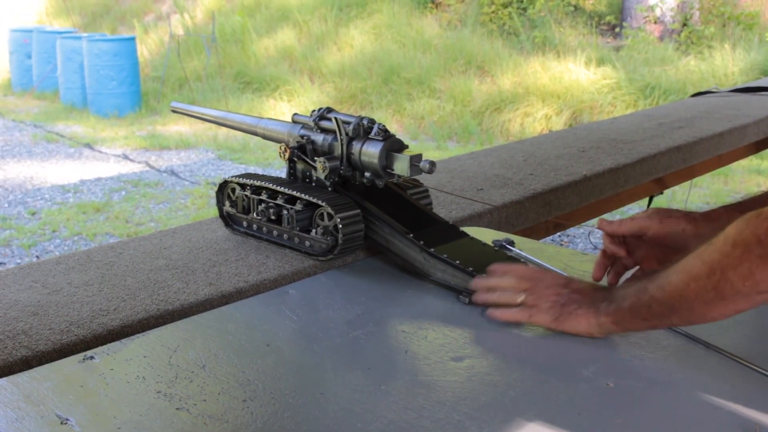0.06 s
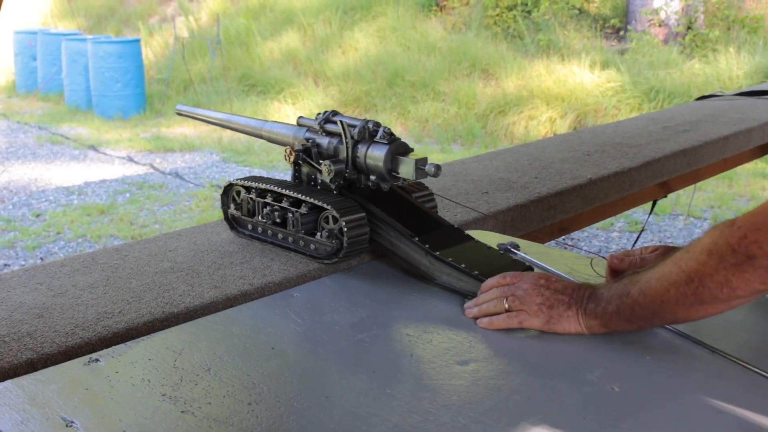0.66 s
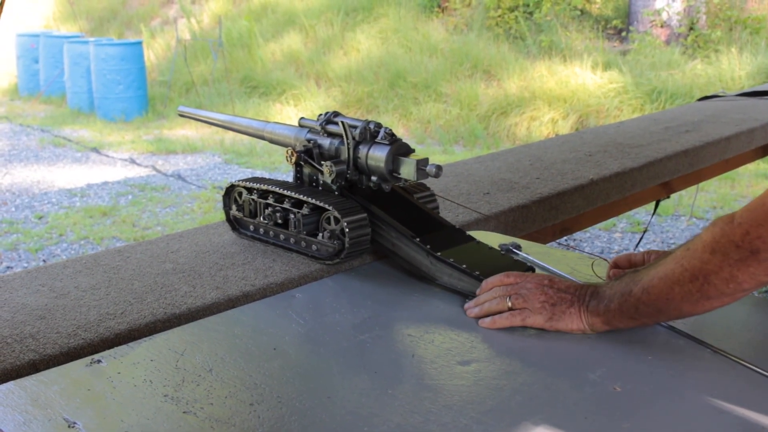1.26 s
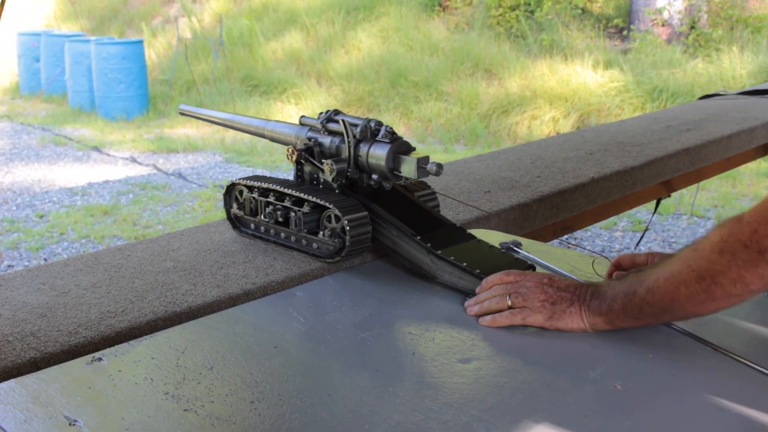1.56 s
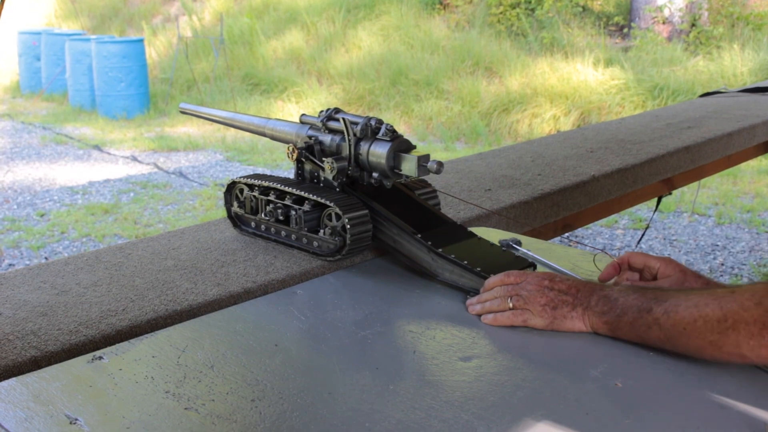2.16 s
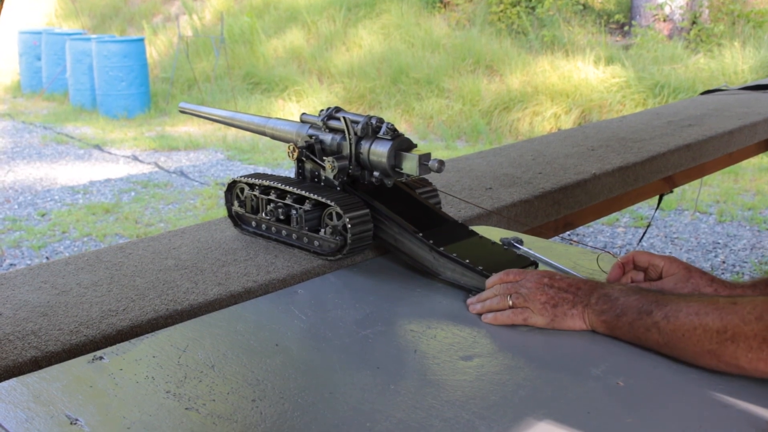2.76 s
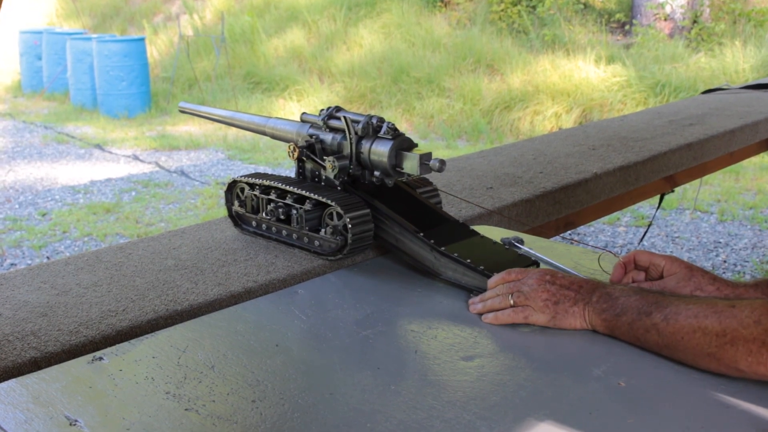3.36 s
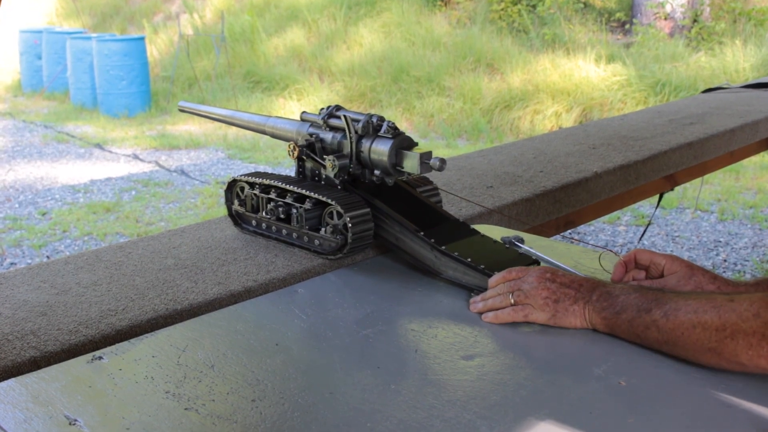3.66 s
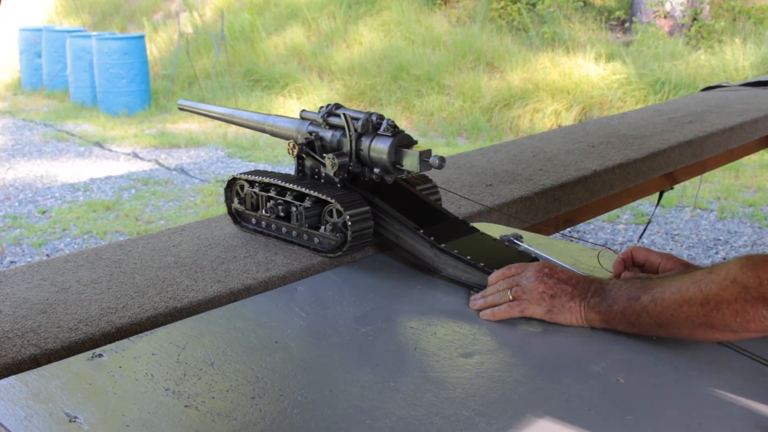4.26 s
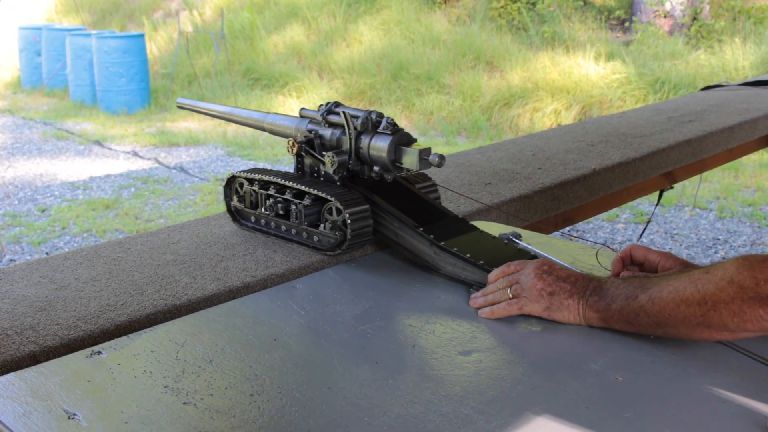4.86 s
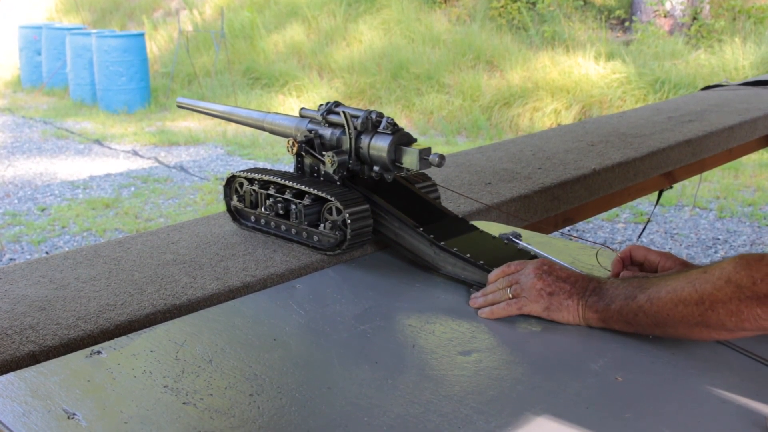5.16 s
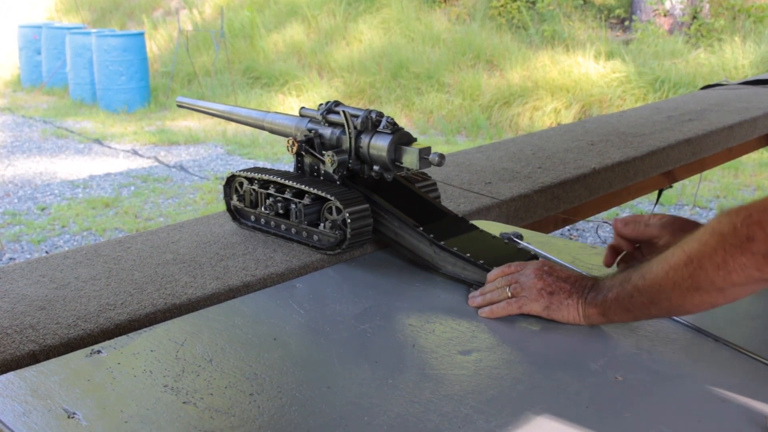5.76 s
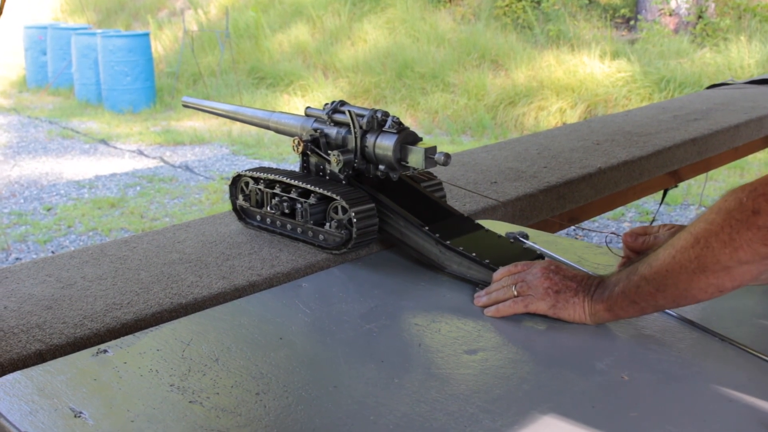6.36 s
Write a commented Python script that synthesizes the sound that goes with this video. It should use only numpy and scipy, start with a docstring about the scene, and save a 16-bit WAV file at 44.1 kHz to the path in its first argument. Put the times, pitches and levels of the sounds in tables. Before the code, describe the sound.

One echoing gunshot, followed by a gritty scrape, knocks and light ticks of handled metal, a distant thud and close birdsong.

```python
"""A model cannon at a shooting range

Under the range's roof a shot rings briefly, then rolls away as echoes from the woods. A metal model cannon
and its rod are handled on a bench: stick-slip friction scuffs and crackles, impacts knock, tick and thump.
Birds whistle gliding tones, one close by and others in the reverberant trees. A distant thud booms low,
perhaps a far shot. The air stirs, insects drone thinly and a camera's electronics whine faintly."""
import sys
import numpy as np
from scipy import signal
from scipy.io import wavfile
from scipy.ndimage import uniform_filter1d

SR = 44100
rng = np.random.default_rng(int(sys.argv[2]) if len(sys.argv) > 2 else 0)


def log_audio(samples):
    """Write samples as a 16-bit WAV file to the path given in sys.argv[1]."""
    # one column per channel
    frames = np.atleast_2d(samples).T
    # limit to full scale, then quantise
    limited = np.clip(frames, -1, 1)
    pcm = np.round(limited * 32767).astype(np.int16)
    wavfile.write(sys.argv[1], SR, pcm)


N = 282681
TIME = np.arange(N) / SR


def from_db(db):
    """Amplitude ratio of a level in decibels."""
    return 10 ** (np.asarray(db) / 20)


def unit_rms(x):
    """Normalisation to unit mean power."""
    return x / np.sqrt(np.mean(x ** 2) + 1e-20)


def band(x, low_hz, high_hz, order=2):
    """Causal Butterworth band-pass."""
    edges = np.clip([low_hz, max(high_hz, low_hz + 10)], 10, SR / 2 - 20)
    return signal.sosfilt(signal.butter(order, edges, "band", fs=SR, output="sos"), x + 1e-18)


def drift(rate_hz):
    """Slow random modulation: low-passed noise of unit rms."""
    step, settle = 40, 2000
    pole = np.exp(-2 * np.pi * rate_hz * step / SR)
    noise = rng.standard_normal(N // step + settle + 2)
    slow = signal.lfilter([1], [1, -2 * pole, pole * pole], noise)[settle:]
    return np.interp(np.arange(N) / step, np.arange(len(slow)), unit_rms(slow))


def add(out, start_s, sound):
    """Superposition of a short sound on a longer one."""
    at = max(round(start_s * SR), 0)
    out[at:at + len(sound)] += sound[:N - at]


def coloured(sources, spectrum, tilt_db=0, pivot_hz=1000, flicker_db=0):
    """Spectral shaping: two sources feed alternate third-octave bands; the tilt is per octave."""
    edges = 22 * 2 ** (np.arange(30) / 3)
    points_hz, points_db = np.transpose(spectrum)
    out, power = 0, 0
    for k, (low, high) in enumerate(zip(edges, edges[1:])):
        hz = np.sqrt(low * high)
        gain = from_db(np.interp(np.log(hz), np.log(points_hz), points_db))
        power += gain ** 2 * (high - low) / (SR / 2)
        octaves = np.log2(max(hz, pivot_hz / 2) / pivot_hz)
        modulation = from_db(tilt_db * octaves + flicker_db * drift(9))
        out += gain * modulation * band(sources[k % 2], low, high, order=3)
    return out / np.sqrt(power)


def swell(full_s, hold_s, level_db, attack_s, release_s):
    """Envelope of exponential growth, a plateau and exponential decay."""
    early, late = np.maximum(full_s - TIME, 0), np.maximum(TIME - full_s - hold_s, 0)
    return from_db(level_db) * np.exp(-np.minimum(early / attack_s + late / release_s, 30))


def joint_swell(rows):
    """Incoherent addition: overlapping swells sum in power."""
    return np.sqrt(sum(swell(*row) ** 2 for row in rows))


# Spectrum of the open air: frequency_hz, density_db
AIR_SPECTRUM = [(15, -42.5), (25, -11), (82, 5), (113, -1), (198, -3), (260, -5.5), (421, -6.5),
                (537, -10.5), (1660, -14.5), (2120, -17), (2290, -11.5), (4740, -10.5), (5880, -13),
                (7910, -26.5), (15500, -37.5)]

def air():
    """Ambient noise: stirring air makes each band fluctuate slightly."""
    return from_db(-48) * coloured(rng.standard_normal((2, N)), AIR_SPECTRUM, flicker_db=1.69)


# Band of the insect chorus: centre_hz, width_hz, level_db
INSECT_BANDS = [(5864, 588, -50.5)]

def insects():
    """Many incoherent callers merge into narrow-band noise."""
    chorus = 0
    for hz, width, level_db in INSECT_BANDS:
        drone = band(rng.standard_normal(N), hz - width / 2, hz + width / 2, order=3)
        chorus += from_db(level_db) * unit_rms(drone)
    return chorus * from_db(.7 * drift(45))


def whine(pitch_hz=15735, rms_db=-75):
    """A pure tone: the camera's electronics sing at their line-scan rate."""
    return from_db(rms_db) * np.sqrt(2) * np.sin(2 * np.pi * pitch_hz * TIME)


# Modes rung by the blast under the roof: frequency_hz, level_db, t60_s
ROOF_MODES = [(148.25, -5.5, 0.049), (388.3, 7.5, 0.0305), (690, -5, 0.074), (1126.6, -12, 0.131)]
# Spectrum of the rolling echoes: frequency_hz, density_db
ECHO_SPECTRUM = [(59, -59), (100, -27.5), (157, -16.5), (221, -15), (282, -13.5), (346, -1), (443, 0),
                 (495, -1), (1010, -10), (1160, -9), (1780, -17), (4240, -38), (5840, -53), (9000, -75.5),
                 (11700, -88), (19800, -120)]
# Returns from roof, woods, a slope and distant hills: arrival_s, hold_s, level_db, attack_s, release_s
SHOT_ECHOES = [(0, 0, -10.5, .002, 0.0458), (.01, 0, -18.5, 0.0112, 0.52), (.285, 0, -22, 0.065, 0.23),
               (1.5, 0, -46.5, .5, 0.884)]

def shot(start_s=.00122, rise_s=.001295):
    """A blast wave excites damped modes; later echoes have travelled farther and are duller."""
    t = np.maximum(TIME - start_s, 0)
    ring = -sum(from_db(db - 60 * t / t60) * np.sin(2 * np.pi * hz * t) for hz, db, t60 in ROOF_MODES)
    blast = band(ring * (1 - np.exp(-t / rise_s)), low_hz=70, high_hz=2700)
    dulling_db = -2 * np.clip(TIME - .3, -.05, 2)
    roll = coloured(rng.standard_normal((2, N)), ECHO_SPECTRUM, dulling_db, pivot_hz=606, flicker_db=.5)
    return blast + roll * joint_swell(SHOT_ECHOES)


def slur(start_s, length_s, from_hz, to_hz, bend, level_db, crest, edge_db=-13, roundness=1.462):
    """Glide contour, rows of time_s, pitch_hz, level_db; positive bend moves early, negative late."""
    progress = np.linspace(0, 1, 60)
    glide = np.expm1(-bend * progress) / np.expm1(-bend)
    pitch_hz = from_hz + (to_hz - from_hz) * glide
    off_crest = np.maximum((crest - progress) / crest, (progress - crest) / (1 - crest))
    return np.transpose([start_s + length_s * progress, pitch_hz, level_db + edge_db * off_crest ** roundness])


def whistle(contour, waver=.003, harmonics=((1, 0),), fade_s=.0013):
    """Frequency modulation: a bird's tone follows its contour, slightly unsteady in pitch."""
    times, pitch_hz, level_db = np.transpose(contour)
    t = np.arange(times[0], times[-1], 1 / SR)
    jitter = unit_rms(uniform_filter1d(rng.standard_normal(len(t)), size=120))
    glide_hz = uniform_filter1d(np.interp(t, times, pitch_hz), size=200)
    phase = 2 * np.pi * np.cumsum(glide_hz * (1 + waver * jitter)) / SR
    tone = sum(from_db(db) * np.sin(k * phase) for k, db in harmonics)
    fade = np.clip(np.minimum(t - times[0], times[-1] - t) / fade_s, 0, 1)
    out = np.zeros(N)
    add(out, times[0], from_db(np.interp(t, times, level_db)) * fade * tone)
    return out


def woods(x, t60_s, build_s):
    """Reverberation: scattering from trunks and leaves builds up and dies away."""
    t = TIME[:SR]
    echoes = rng.standard_normal(SR) * from_db(-60 * t / t60_s) * (1 - np.exp(-t / build_s))
    return signal.fftconvolve(x, echoes / np.linalg.norm(echoes))[:N]


# A phrase of two falling slurs: offset_s, length_s, from_hz, to_hz, bend, level_db, crest_fraction
FAR_PHRASE = [(0, .09, 3503, 2420, .5, 0, .58), (0.214, .1, 2220, 1778, 2.03, -10.5, 0.345)]
# Its repeats, about 0.8 s apart: start_s, gain_db
PHRASE_REPEATS = [(1.035, -57), (1.8, -53.5), (2.61, -52.5), (3.46, -41)]
# Single calls from the trees: start_s, length_s, from_hz, to_hz, bend, level_db, crest_fraction
FAR_SLURS = [(3.35, 0.0553, 1857, 1719, -1, -54, 0.45), (3.55, .11, 2672, 2362, -1.5, -50, 0.454),
             (3.785, .125, 1850, 2501, 0.02, -55, .55), (4.314, 0.1105, 3400, 3836, 3.5, -40, 0.43),
             (4.601, 0.1117, 3329, 3788, 3, -40.5, 0.466), (5.869, .08, 2004, 2811, 5, -47, 0.46),
             (6.051, 0.132, 785, 737.3, 0.35, -61, 0.58), (6.133, 0.27, 2299, 1746, 2, -51, 0.096)]

def far_birds():
    """Far from a source, the reverberant field outweighs the direct sound."""
    notes = [slur(*note) + [start_s, 0, db] for start_s, db in PHRASE_REPEATS for note in FAR_PHRASE]
    notes += [slur(*row) for row in FAR_SLURS]
    calls = sum(whistle(note, waver=.0075) for note in notes)
    early = from_db(7) * woods(calls, t60_s=.1408, build_s=.0035)
    late = from_db(2) * woods(calls, t60_s=1, build_s=.0027)
    return from_db(4) * calls + early + late


def slips(per_s, spread_db):
    """Stick-slip friction: tiny clicks of uneven size at random moments."""
    clicks = (rng.random(N) < per_s / SR) * rng.choice([-1, 1], N)
    sizes = from_db(spread_db * np.minimum(rng.exponential(1, N), 4))
    return unit_rms(clicks * sizes)


# Spectrum of sliding over grit: frequency_hz, density_db
GRIT_SPECTRUM = [(59, -49.5), (100, -26.5), (258, -13), (438, -17), (564, -6.5), (640, -9), (842, -3.5),
                 (1260, -5), (2220, -0.5), (2470, -7), (3050, -2.5), (6120, -7), (15500, -33)]
# Gritty strokes: full_s, hold_s, level_db, attack_s, release_s, tilt_db_per_octave
SCUFF_STROKES = [(1.391, 0.0044, -39.5, 0.0097, 0.0256, 0), (1.476, 0.0395, -28.5, 0.0188, 0.021, -0.12),
                 (1.528, 0.0352, -15.5, 0.0121, 0.0245, -3), (1.59, .04, -34, .02, 0.0313, -4),
                 (1.732, 0.00041, -37, 0.0044, 0.037, -8), (1.744, 0.039, -42, .01, 0.0204, 3),
                 (1.845, 0.0077, -37.5, 0.0112, 0.0337, -.5)]

def scuffs(lag_s=.0024, reflection=.157):
    """Sliding friction on grit, comb-filtered by one reflection from the hard bench top."""
    powers = np.array([swell(*row[:-1]) ** 2 for row in SCUFF_STROKES])
    total_power = powers.sum(axis=0)
    tilt_db = np.array(SCUFF_STROKES)[:, -1] @ powers / total_power
    grit = [slips(per_s=9000, spread_db=1.5) for _ in range(2)]
    direct = np.sqrt(total_power) * coloured(grit, GRIT_SPECTRUM, tilt_db, pivot_hz=2400, flicker_db=-2)
    return direct + reflection * np.interp(TIME - lag_s, TIME, direct, left=0)


# Bench thumps and, near 4.23 s, the distant thud's boom: start_s, peak_db, centre_hz, width_hz, swell_s
THUMPS_AND_BOOM = [(1.503, -23.5, 280, 93, 0.0068), (1.575, -31, 340, 320, .04),
                   (2.462, -37, 80, 48, 0.0232), (4.238, -31.5, 126.8, 47, 0.0265),
                   (4.225, -34.5, 53, 46, 0.0494), (4.22, -31, 352, 253, 0.0333),
                   (5.471, -38, 170.7, 16, 0.0276), (5.569, -42.5, 230, 28, 0.0144),
                   (5.756, -39, 178.3, 29, 0.0227)]

def thumps_and_boom():
    """Low bands of noise swell and fade: the bench resonating under weight, and a distant boom."""
    out, t = np.zeros(N), TIME[:SR // 2]
    for start_s, peak_db, hz, width, swell_s in THUMPS_AND_BOOM:
        rumble = band(rng.standard_normal(SR), hz - width / 2, hz + width / 2)[-len(t):]
        boom = rumble * t * np.exp(-t / swell_s)
        add(out, start_s, from_db(peak_db) * boom / np.abs(boom).max())
    return out


# Resonances of the model on its bench: centre_hz, width_hz, gain_db
CANNON_MODES = [(576, 56.6, 1), (1020.6, 23, 0), (1376, 51, -6.5), (1896, 39, -4)]

def cannon_body(x):
    """Modal response: two-pole resonators driven in parallel."""
    out = 0
    for hz, width, db in CANNON_MODES:
        radius = np.exp(-np.pi * width / SR)
        poles = [1, -2 * radius * np.cos(2 * np.pi * hz / SR), radius ** 2]
        out += from_db(db) * (1 - radius ** 2) / 2 * signal.lfilter([1, 0, -1], poles, x)
    return out


# Knocks of model and rod and, at 4.214 s, a distant thud: start_s, peak_db, low_hz, high_hz, t60_s
KNOCKS_AND_THUD = [(1.6565, -12.5, 640, 3210, 0.1335), (2.008, -27.5, 300, 745, 0.013),
                   (2.0155, -21.5, 290, 895, 0.0089), (2.028, -24, 288, 905, 0.091),
                   (3.195, -38, 2500, 4500, 0.057), (3.965, -40, 1300, 2240, 0.157),
                   (4.214, -33.5, 110, 1645, 1), (5.4529, -23, 579, 1602, 0.17),
                   (5.59, -34, 1010, 3380, 0.166), (5.734, -29.5, 570, 1615, 0.159)]
# Light ticks of the rod: start_s, peak_db
ROD_TICKS = [(2.307, -35.5), (2.333, -37.5), (2.354, -34.5), (2.382, -34), (2.416, -35.5), (2.461, -33.5),
             (2.534, -34), (2.793, -36.5), (2.866, -37), (3.021, -40)]
TICK_LOW_HZ, TICK_HIGH_HZ, TICK_T60_S = 680, 1970, .026

def knocks_and_thud(click=9.84, skirt_db=-14, body_db=2.5):
    """Impulse and damped ring: harder contacts sound higher; the distant thud is low and lingers."""
    out, t = np.zeros(N), TIME[:SR // 2]
    ticks = [(*tick, TICK_LOW_HZ, TICK_HIGH_HZ, TICK_T60_S) for tick in ROD_TICKS]
    for start_s, peak_db, low_hz, high_hz, t60_s in KNOCKS_AND_THUD + ticks:
        burst = rng.standard_normal(len(t)) * from_db(-60 * t / t60_s)
        burst[0] += click
        ring = band(burst, low_hz, high_hz, order=4)
        ring += from_db(skirt_db) * band(burst, low_hz / 2, high_hz)
        ring += from_db(body_db) * cannon_body(ring)
        add(out, start_s, from_db(peak_db) * ring / np.abs(ring).max())
    return out


# Finger strokes on the rod: full_s, hold_s, level_db, attack_s, release_s
FINGER_RUBS = [(2.1, 0, -52.5, 0.22, 0.186), (2.41, 0.0314, -47.5, 0.11, 0.093),
               (2.82, 0, -52.5, 0.038, 0.18)]

def rubbing():
    """Skin creeps along the rod by stick-slip, giving a soft, dull crackle."""
    crackle = band(slips(per_s=430, spread_db=-1.5), low_hz=727, high_hz=2066)
    return joint_swell(FINGER_RUBS) * unit_rms(crackle)


def syllable(contour, start_s, stretch, semitones, gain_db):
    """Time scaling and transposition of a pitch contour."""
    return np.array(contour) * [stretch, 2 ** (semitones / 12), 1] + [start_s, 0, gain_db]


# The near bird's opening chip: time_s, pitch_hz, level_db
OPENING_CHIP = [(3.643, 2838, -42.5), (3.655, 3150, -32), (3.668, 3100, -44), (3.679, 2290, -37)]
# Its partials, the second strongest: harmonic_number, level_db
CHIP_PARTIALS = [(1, -6), (2, 2.5), (3, -14)]
# Plain glides of the song: start_s, length_s, from_hz, to_hz, bend, level_db, crest_fraction
NEAR_SLURS = [(3.785, 0.045, 5402, 5355, 1.5, -40, 0.48), (3.843, .05, 4757, 4066, -2, -30.5, 0.44),
              (3.988, .06, 5614, 5375, -3, -22.5, 0.454), (4.047, 0.056, 5676, 6346, 13.5, -24, 0.44),
              (4.878, .086, 4166, 4942, 10, -19.3, .53), (5.154, .08, 4361, 4982, 9, -24.5, 0.275),
              (5.352, .058, 4963, 3606, -1.5, -23.5, 0.408), (5.398, 0.0395, 3700, 3000, 1.5, -42, 0.45),
              (5.44, .073, 4850, 6440, 2.5, -27.5, 0.304)]
# Two syllables, a sinking note that flicks up and a steep arch: offset_s, pitch_hz, level_db
FLICK_CONTOUR = [(0, 5300, -35.5), (.02, 4994, -20), (.05, 4723, -22.5), (.066, 4390, -38),
                 (.074, 6315, -25.5), (.085, 7400, -35), (.094, 8705, -54.5), (.106, 6020, -32)]
ARCH_CONTOUR = [(0, 5938, -30), (.014, 7897, -43), (.031, 7370, -38), (.049, 6508, -24), (.06, 4720, -22),
                (.079, 4017, -30), (.1, 3200, -43)]
# Each is sung twice: start_s, stretch_ratio, shift_semitones, gain_db
FLICK_REPEATS = [(4.188, 1, 0.0038, 0), (4.473, 1.04, .5, -1)]
ARCH_REPEATS = [(4.76, 1, .15, 0), (5.033, 1.02, -0.3456, -.5)]

def near_bird():
    """Close to a source the direct sound dominates; nearby trunks answer first, the wood lingers."""
    notes = [slur(*row) for row in NEAR_SLURS]
    notes += [syllable(FLICK_CONTOUR, *row) for row in FLICK_REPEATS]
    notes += [syllable(ARCH_CONTOUR, *row) for row in ARCH_REPEATS]
    song = sum(whistle(note, waver=.0028) for note in notes)
    song += whistle(OPENING_CHIP, harmonics=CHIP_PARTIALS)
    song *= from_db(.58 * drift(90))
    early = from_db(-6.5) * woods(song, t60_s=.211, build_s=.0079)
    late = from_db(-8) * woods(song, t60_s=.933, build_s=.0033)
    return from_db(-2) * song + early + late


def scene():
    """Superposition of the airborne sounds at one microphone."""
    bangs_and_handling = shot() + scuffs() + rubbing() + knocks_and_thud() + thumps_and_boom()
    return (bangs_and_handling + near_bird() + far_birds() + air() + insects())[None]


def record(dry, cutoff_hz=15780):
    """The electronics add their whine, clip at full scale and low-pass the result."""
    clipped = np.clip(dry + whine(), -1, 1)
    return signal.sosfilt(signal.ellip(12, .1, 80, cutoff_hz, fs=SR, output="sos"), clipped)


dry = scene()
out = record(dry)
log_audio(out)
```